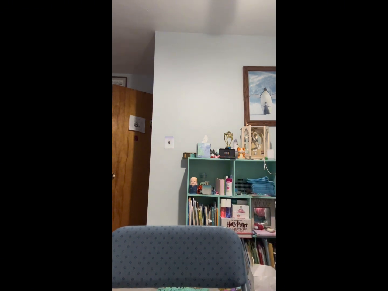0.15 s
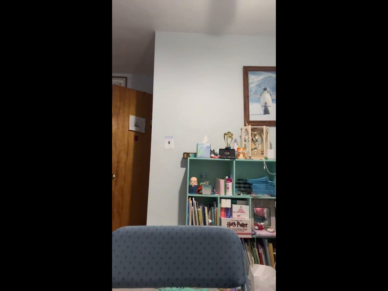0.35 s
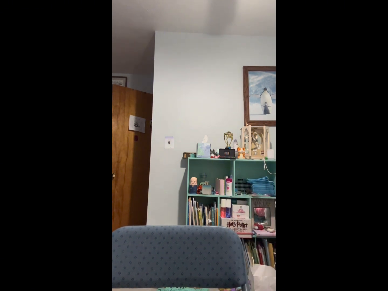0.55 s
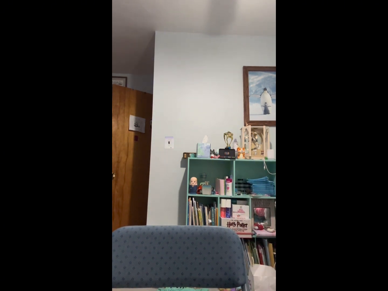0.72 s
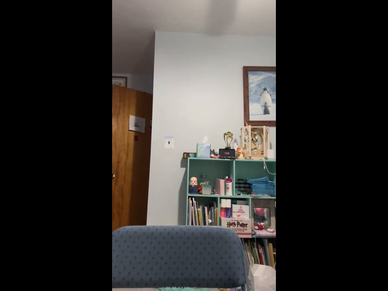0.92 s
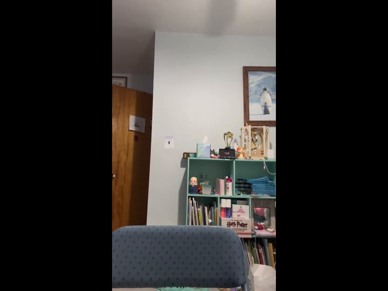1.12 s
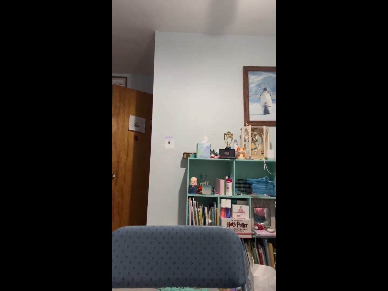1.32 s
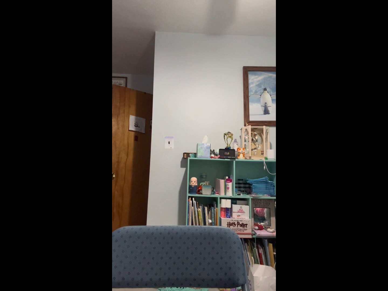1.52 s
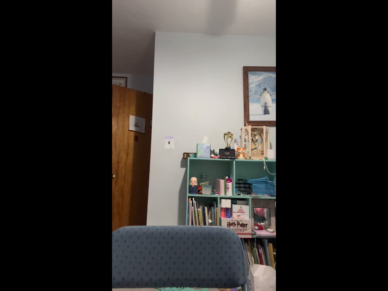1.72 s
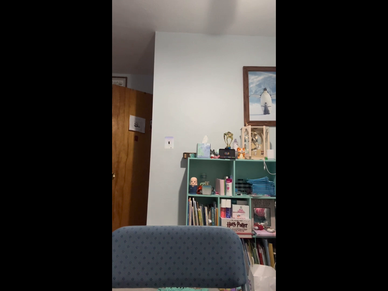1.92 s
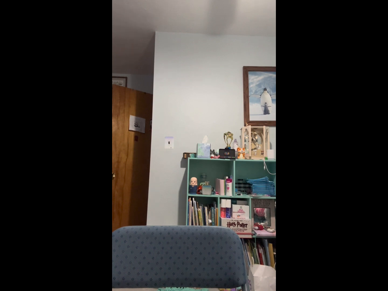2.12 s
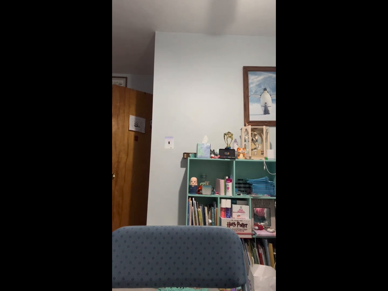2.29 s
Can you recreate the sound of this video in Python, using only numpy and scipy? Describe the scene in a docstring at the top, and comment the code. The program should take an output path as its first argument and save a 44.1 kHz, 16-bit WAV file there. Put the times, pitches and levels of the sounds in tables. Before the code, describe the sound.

Rummaging in a wooden drawer in a small quiet bedroom: a hard thump, a hollow rattle, two rough scraping strokes with knocks and ticks, then faint soft bumps. Close stereo microphone, drawer slightly to the left.

```python
"""Rummaging in a wooden drawer

In a small bedroom things scrape along the drawer's bottom in two long strokes: shaped bands of noise,
with one chirp of binding wood. Thumps, a rattling hollow item and light taps are damped sinusoids with
puffs of contact noise, small hard pieces tick as puffs alone, and a few soft bumps follow.
Short sounds get a decaying noise tail for the room, and quiet air noise lies beneath."""
import sys
import numpy as np
from scipy import signal
from scipy.fft import rfft, irfft, next_fast_len
from scipy.io import wavfile
from scipy.ndimage import uniform_filter1d, map_coordinates

SR = 44100
rng = np.random.default_rng(int(sys.argv[2]) if len(sys.argv) > 2 else 0)


def master(y):
    """Save y as 16-bit WAV."""
    cut = np.clip(np.atleast_2d(y).T, -1, 1)
    pcm = np.round(cut * 32767)  # scale
    wavfile.write(sys.argv[1], SR, pcm.astype(np.int16))


N = 103635  # samples
HALF_SECOND = SR // 2  # samples


def amp(db):
    """Level: decibels become an amplitude ratio."""
    return 10 ** (np.asarray(db) / 20)


def unit(x):
    """Normalisation: scale to rms 1."""
    return x / np.sqrt(np.mean(x ** 2) + 1e-20)


def along(points, hz):
    """Logarithmic frequency: interpolate (Hz, value) points on a log axis."""
    f, v = np.transpose(points)
    return np.interp(np.log(hz + 1), np.log(f + 1), v)


def wobble(rate):
    """Random modulation: straight lines join random knots, rate knots a second."""
    knots = rng.standard_normal(N)
    return map_coordinates(knots, [np.arange(N) * rate / SR], order=1)


def filtered(x, response):
    """Linear filtering: the spectrum of x is multiplied by a response of frequency."""
    m = next_fast_len(N + SR // 2)
    return irfft(rfft(x, m) * response(np.fft.rfftfreq(m, 1 / SR)), m)[..., :N]


# Likeness of the two channels.
# Each row: frequency in Hz, left-right correlation from 0 to 1.
CHANNEL_LIKENESS = [(60, .9), (150, 0.94), (300, 0.048), (700, 0), (2000, 0), (6000, 0), (8000, 0.88),
                    (14000, 0.96)]


def noise(spectrum, likeness=CHANNEL_LIKENESS):
    """Partial coherence: mid and side noises, mixed by frequency, give coloured stereo of rms 1."""
    def mid_side_gains(hz):
        turn = np.arccos(np.clip(along(likeness, hz), -1, 1)) / 2
        return amp(along(spectrum, hz)) * [np.cos(turn), np.sin(turn)]

    mid, side = filtered(rng.standard_normal((2, N)), mid_side_gains)
    return unit(np.array([mid + side, mid - side]))


def fade(t60, rise):
    """Exponential damping: half a second with rise time constant and 60 dB decay time in seconds."""
    t = np.arange(HALF_SECOND) / SR
    return (1 - np.exp(-t / rise)) * np.exp(-np.log(1000) * t / t60)


def ring(hz, t60, rise, lag):
    """Damped oscillation: one mode in two channels, the right one lagging by lag radians."""
    t = np.arange(HALF_SECOND) / SR
    return np.sin(2 * np.pi * hz * t - np.array([[0], [lag]])) * fade(t60, rise)


def modes(table, rise, ratio=1):
    """Modal superposition: strengths and pitches shift a little with each point of contact."""
    scatter_db, detune = 1.5, .008  # standard deviations; detune is a fraction of the pitch
    total = 0
    for hz, db, t60 in table:
        gain = amp(db + scatter_db * rng.normal()) * rng.choice([-1, 1])
        pitch = hz * ratio * (1 + detune * rng.normal())
        lag = rng.uniform(-0.9, 1) * np.arccos(np.clip(along(CHANNEL_LIKENESS, hz), -1, 1))
        total = total + gain * ring(pitch, t60, rise, lag)
    return total / np.sqrt(len(table))


def burst(source, t60, rise):
    """Transient noise: a decaying puff cut from a random place in a longer noise."""
    start = rng.integers(N - HALF_SECOND)
    return source[:, start:start + HALF_SECOND] * fade(t60, rise)


def softened(x, bright_hz):
    """Contact stiffness: a soft contact, as a minimum-phase low-pass, leaves high notes unexcited."""
    rolloff_db_per_oct = 7.5  # well above bright_hz
    hz = np.fft.rfftfreq(SR, 1 / SR)
    log_gain = np.log(amp(-rolloff_db_per_oct / 4 * np.log2(1 + (hz / bright_hz) ** 4)))
    # Folding the cepstrum onto positive times makes the filter causal.
    fold = np.r_[1, np.full(SR // 2 - 1, 2), np.zeros(SR - SR // 2)]
    causal = irfft(log_gain) * fold
    return irfft(rfft(x, SR) * np.exp(rfft(causal)))[:, :x.shape[1]]


# Reverberation of the bedroom.
# Each row: frequency in Hz, 60 dB decay time in seconds.
ROOM_DECAY = [(80, 0.25), (250, 0.14), (1000, 0.022), (4000, 0.026), (12000, 0.067)]


def in_room(x, wet_db):
    """Reverberation: convolution with a delayed noise tail that decays at its own rate in each band."""
    delay_s = .012
    hz, t, z = signal.stft(rng.standard_normal((2, SR // 3)), SR, nperseg=256)
    decay = np.exp(-np.log(1000) * t / along(ROOM_DECAY, hz)[:, None])
    tail = signal.istft(z * decay, SR, nperseg=256)[1]
    tail = np.pad(tail / np.linalg.norm(tail[0]), ((0, 0), (int(delay_s * SR), 0)))
    return x + amp(wet_db) * signal.fftconvolve(x, tail, axes=1)[:, :x.shape[1]]


def add(out, s, x):
    """Superposition: mix x into out at time s in seconds."""
    part = out[:, max(round(s * SR), 0):][:, :x.shape[1]]
    part += x[:, :part.shape[1]]


# Still air of the room.
# Each row: frequency in Hz, relative density in dB per Hz.
AIR_SPECTRUM = [(15, -46.5), (25, 0.5), (274, -10), (1570, -30), (3440, -29.5), (3720, -32), (5430, -36),
                (12500, -39.5), (15500, -49)]


def still_air():
    """Stationary noise: the quiet room has a steady coloured floor."""
    return amp(-74) * noise(AIR_SPECTRUM)


def patchy(x):
    """Shifting resonance: narrow bands come and go as the contact points shift."""
    depth_db = 2.6  # rms
    z = signal.stft(x, nperseg=1024)[2]
    field = rng.standard_normal(z.shape[1:])
    field = uniform_filter1d(field, size=3, axis=0)  # blur over frequency
    field = uniform_filter1d(field, size=4, axis=1)  # blur over time
    return unit(signal.istft(z * amp(depth_db * unit(field)), nperseg=1024)[1][:, :N])


TICK_RISE_S = .0005  # time constant, shared by catches and ticks


def catches():
    """Stick-slip: random little catches on the wood form a decaying envelope of rms 1."""
    per_s, spread_db, t60_s = 98, 7.5, 0.034
    strength_db = spread_db * np.clip(rng.standard_normal(N), -2, 2)
    kicks = (rng.random(N) < per_s / SR) * amp(strength_db)
    return unit(signal.fftconvolve(kicks, fade(t60_s, TICK_RISE_S))[:N])


# The sliding load, before the overall trims and wobbles in sliding().
# Each row: time in seconds, then levels of scrape, rumble, treble rasp and top hiss, all in dB.
SLIDE_LEVELS = [(0, -53.5, -51.5, -65.5, -73), (.101, -52.5, -45, -60.5, -71.5),
                (.151, -44, -39.5, -47.5, -58.5), (0.2, -37, -30, -41.5, -54),
                (0.3, -40.5, -40, -41.5, -55.5), (.36, -32, -26.5, -40.5, -56),
                (.46, -47.5, -31, -51, -72.5), (.56, -42, -40, -43.5, -57.5),
                (0.682, -34.5, -26.5, -41, -57), (.75, -47.5, -31, -54.5, -77),
                (0.819, -58, -42, -69.5, -99), (.891, -51, -44.5, -59.5, -83),
                (.938, -38, -30.5, -56, -71.5), (1.0, -41.5, -33, -46.5, -62), (1.045, -38, -35, -44, -61),
                (1.111, -36, -27.5, -41.5, -55.5), (1.209, -34.5, -29, -40.5, -56.5),
                (1.338, -42, -34, -48.5, -65.5), (1.431, -43, -43, -49.5, -59.5),
                (1.48, -46.5, -42.5, -53.5, -66), (1.539, -48, -40, -55, -61.5),
                (1.62, -70, -50, -74.5, -85.5), (1.68, -79, -60.5, -93, -97), (1.74, -62.5, -55, -80, -89),
                (1.791, -76, -50.5, -80, -94), (1.825, -59, -43, -77, -90),
                (1.892, -84.5, -61, -84.5, -101), (1.95, -82, -56.5, -94.5, -100.5),
                (2.07, -92, -82.5, -94, -91), (2.14, -86, -70.5, -84, -78.5),
                (2.188, -63, -50, -79.5, -76.5), (2.271, -85, -58.5, -75.5, -81),
                (2.35, -64, -58, -63, -73)]
# Noise spectra of the four parts, and of the clatter in catches and rattles.
# Each row: frequency in Hz, relative density in dB per Hz.
SCRAPE_SPECTRUM = [(150, -32.5), (400, -5.5), (520, 13), (750, 12.5), (1000, 11.5), (1170, 0), (1500, 1),
                   (2000, -10.5), (4000, -39.5)]
RUMBLE_SPECTRUM = [(20, -32.5), (45, -13), (75, 1.5), (130, -1.5), (200, -2.5), (260, -2.5), (310, -10.5),
                   (375, -4.5), (460, -27.5), (900, -42), (3000, -87)]
RASP_SPECTRUM = [(700, -27.5), (1400, 5.5), (2200, -0.5), (3200, -.5), (5000, -4.5), (6500, -8.5),
                 (8000, -20), (11000, -35)]
HISS_SPECTRUM = [(3000, -53), (6500, -0.5), (8200, -0.5), (10500, -1.5), (12000, 3.5), (13300, 5),
                 (14200, -5.5), (14800, -26.5), (16000, -48.5)]
CLATTER_SPECTRUM = [(200, -13), (700, 10.5), (1500, -8.5), (3000, -8.5), (5000, -19), (8000, -32),
                    (14000, -63.5)]


def sliding():
    """Friction noise: a catching scrape, gritty rasp and hiss lie above the drawer's juddering rumble."""
    s, *levels = np.transpose(SLIDE_LEVELS)
    t = np.arange(N) / SR
    scrape_db, rumble_db, rasp_db, hiss_db = [np.interp(t, s, level) for level in levels]
    judder_db = 1.5 * wobble(rate=85)
    grit_db = 1.3 * wobble(rate=370)
    caught = amp(-8.5) * catches() * noise(CLATTER_SPECTRUM)
    scrape = amp(-2 + scrape_db + judder_db + grit_db) * (patchy(noise(SCRAPE_SPECTRUM)) + caught)
    rasp = amp(-1.5 + rasp_db + grit_db) * patchy(noise(RASP_SPECTRUM))
    rumble = amp(rumble_db + judder_db) * noise(RUMBLE_SPECTRUM)
    hiss = amp(-0.5 + hiss_db) * noise(HISS_SPECTRUM)
    return scrape + rasp + rumble + hiss


# Contact noise of a tap.
# Each row: frequency in Hz, relative density in dB per Hz.
SCUFF_SPECTRUM = [(150, -16.5), (450, -1.5), (850, -4.5), (1150, -3.5), (1550, -3.5), (2100, -8.5),
                  (2900, -9), (5000, -19), (9000, -34)]
# Light taps of assorted items.
# Each row: start in seconds, level in dB, note in Hz, note gain beside the scuff in dB,
# 60 dB decay time in seconds, brightness of the contact in Hz.
TAP_EVENTS = [(.043, -43.5, 1515, 5, 0.03, 2180), (.076, -44.5, 970, 5, .035, 1510),
              (0.162, -35, 986, -4, 0.05, 1590), (.328, -23, 690, 6, 0.023, 1800),
              (.525, -27, 1530, -5, 0.054, 1900), (.667, -24.5, 1370, -7, 0.025, 2400),
              (0.845, -45, 1430, -7, 0.13, 2230), (1.098, -42, 1508, 1, .08, 2000),
              (1.179, -28.5, 845, 3.5, 0.059, 2040), (1.301, -46.5, 1060, 12, 0.11, 1300),
              (1.36, -37, 776, -6, 0.056, 1300), (1.432, -46, 805, 9, 0.034, 1800),
              (1.484, -44.5, 636, 7.5, 0.064, 1100), (1.694, -67.5, 1300, -7, 0.15, 1400),
              (1.735, -62, 900, 1, .1, 1990), (1.746, -66, 2486, -5, .1, 3200),
              (1.805, -55, 990, 8.5, 0.074, 2180), (1.822, -67, 4760, -3, .16, 4500),
              (2.147, -65, 950, 3.5, 0.072, 1206), (2.187, -60.5, 1290, 5, 0.032, 1200)]


def taps():
    """Impact excitation: assorted items touch with a short scuff and one quickly damped note."""
    rise_s, wet_db, widest_lag_rad = .0007, -5, 4.9
    out, scuff = np.zeros((2, N)), noise(SCUFF_SPECTRUM)
    for s, db, hz, note_db, t60, bright_hz in TAP_EVENTS:
        contact = softened(burst(scuff, t60, rise_s), bright_hz)
        note = amp(note_db) * ring(hz, t60, rise_s, widest_lag_rad * rng.uniform(-1, 1))
        add(out, s, amp(db) * in_room(contact + note, wet_db))
    return out


THUMP_WET_DB = -18  # room level, shared by thumps and squeak
# Modes of the drawer's panels, before the scatter of each contact.
# Each row: frequency in Hz, level in dB, 60 dB decay time in seconds.
PANEL_MODES = [(97, -12, 0.28), (119, -2.5, 0.032), (170, 12, 0.072), (229.5, 5.5, 0.28), (279.4, 3.5, .13),
               (356, 5, .15), (390, 1, 0.11), (491, -3.5, 0.12), (533, -5.5, .14), (648, -3.5, .09),
               (804, -4, 0.24), (844, -8.5, 0.27), (977, -1, 0.12), (1085, -8.5, 0.29)]
# Contact noise of a thump.
# Each row: frequency in Hz, relative density in dB per Hz.
CRUNCH_SPECTRUM = [(30, -27.5), (90, -10.5), (400, 5.5), (700, -3), (1200, -8.5), (2500, -9.5),
                   (6000, -23.5), (12000, -46.5)]
# Thumps on the wood.
# Each row: start in seconds, level in dB, pitch in Hz, 60 dB decay time in seconds,
# rise time constant in seconds, panel ring in dB, brightness of the contact in Hz,
# knock of the drawer front in dB, lag of the right channel in radians; panel and front ride on the level.
THUMP_EVENTS = [(.183, -25, 197.6, 0.13, 0.012, -12, 430, -43, 0.4),
                (0.3222, -18.5, 264, 0.038, 0.0023, -9.5, 900, -15, 1.7),
                (0.3323, -1, 242, 0.058, 0.00063, -15.5, 700, -31, 1.87),
                (.345, -19.5, 274, 0.046, .0042, -0.5, 403, -40, 2.4),
                (.366, -14.5, 266, 0.16, 0.0024, -15, 300, -32, 0.71),
                (0.5191, -9.5, 246.7, 0.097, .0022, -25, 800, -11.5, 1.6),
                (.528, -5.5, 241.3, .09, 0.00099, -7.5, 330, -20, 0.83),
                (.669, -13, 226, 0.15, 0.003, -7.5, 1200, -10.5, 1.8),
                (.675, -7.5, 169.2, 0.13, 0.0071, -9, 695, -31, 0.8),
                (.688, -11.5, 203.5, 0.08, .003, -11.5, 496.6, -35, 0.9),
                (0.705, -10.5, 222, 0.087, 0.0019, -11.5, 296, -29.5, .26),
                (.911, -18, 202, 0.07, 0.0025, -8, 740, -4, 1.24),
                (.931, -4.5, 102, 0.11, .014, -22, 440, -24.5, 0.13),
                (.960, -21, 253, 0.077, .002, -12, 494, -20, 0.42),
                (1.001, -21.5, 184, 0.093, .004, -8.5, 400, -25, .4),
                (1.117, -24, 182, .08, .003, -5, 600, -14, 0.72),
                (1.195, -22.5, 185, 0.066, 0.0018, -11, 700, -11, 0.67),
                (1.5339, -20, 220, 0.059, 0.0011, -15, 410, -24.5, 1.05),
                (1.549, -17, 129.5, 0.099, 0.0032, -24, 200, -34, .3),
                (1.570, -18.5, 117, 0.079, 0.0032, -21, 193, -50, .083),
                (1.797, -33, 202, 0.11, 0.0066, -14.5, 449, -39, .6),
                (1.81, -37.5, 367, 0.075, 0.0019, -13, 450, -31, 2.5),
                (1.831, -34.5, 274, 0.064, 0.0053, -6.5, 420, -35, 1.2),
                (1.901, -37, 216, 0.12, 0.0059, -20, 400, -34, 0.33),
                (2.160, -48.5, 161, 0.079, 0.0045, -11.5, 330, -33, .38),
                (2.203, -36.5, 104, .1, 0.0024, -18, 250, -46, 0.26)]


def thumps():
    """Modal impact: a low short note with panel ring and crunch; the heavy chest answers late and low."""
    panel_rise_s, boom_delay_s = .002, 0.0083
    out, crunch_noise = np.zeros((2, N)), noise(CRUNCH_SPECTRUM)
    boom = ring(hz=97, t60=.08, rise=.0071, lag=0)
    for s, db, hz, t60, rise, panel_db, bright_hz, front_db, lag in THUMP_EVENTS:
        note = ring(hz, t60, rise, lag)
        crunch = amp(-4) * burst(crunch_noise, t60=.1, rise=panel_rise_s)
        wood = softened(modes(PANEL_MODES, panel_rise_s) + crunch, bright_hz)
        front = amp(front_db) * ring(hz=695.7, t60=.1, rise=0.0021, lag=lag)
        add(out, s, amp(db) * in_room(note + amp(panel_db) * wood + front, THUMP_WET_DB))
        add(out, s + boom_delay_s, amp(db - 13) * boom)
    return out


# Noises of a small hard piece.
# Each row: frequency in Hz, relative density in dB per Hz.
SNAP_SPECTRUM = [(400, -19.5), (1500, 0.5), (3000, 6), (6000, 4.5), (8000, -8), (12000, -34)]
SIZZLE_SPECTRUM = [(4000, -28.5), (7500, -5), (10500, -4.5), (12500, 4), (14000, -1.5), (15000, -14.5),
                   (16000, -29)]
# Likeness of the sizzle's channels.
# Each row: frequency in Hz, left-right correlation from 0 to 1.
SIZZLE_LIKENESS = [(7000, .3), (13000, .05)]
# Small pieces catching and slipping.
# Each row: start in seconds, snap level in dB, sizzle level in dB, 60 dB decay time in seconds.
TICK_EVENTS = [(.3064, -66, -20, 0.0037), (.3285, -34.5, -46, 0.036), (0.5227, -20, -53, 0.013),
               (.670, -48, -53, 0.044), (0.842, -57, -72, 0.031), (1.0598, -30, -30, .018),
               (1.075, -37.5, -41, 0.1), (1.177, -35, -40, 0.091), (1.192, -35, -44.5, 0.12),
               (1.357, -39.5, -43.5, 0.03), (1.373, -41.5, -50.5, 0.081), (1.424, -44, -57, 0.038),
               (1.439, -44.5, -53, 0.075), (1.516, -60, -47.5, 0.017), (1.53, -53, -50, 0.044)]


def ticks():
    """Stick-slip release: small hard pieces catch and slip with a snap and a high sizzle."""
    out = np.zeros((2, N))
    snap_noise, sizzle_noise = noise(SNAP_SPECTRUM), noise(SIZZLE_SPECTRUM, SIZZLE_LIKENESS)
    for s, snap_db, sizzle_db, t60 in TICK_EVENTS:
        snap = amp(snap_db) * burst(snap_noise, t60, TICK_RISE_S)
        sizzle = amp(sizzle_db) * burst(sizzle_noise, t60, TICK_RISE_S)
        add(out, s, in_room(snap, wet_db=-11.5) + sizzle)
    return out


# Modes of the hollow item, before the pitch ratio and scatter of each contact.
# Each row: frequency in Hz, level in dB, 60 dB decay time in seconds.
HOLLOW_MODES = [(679, 0, 0.09), (731, 0.5, 0.14), (923, -6.5, 0.09), (1334, -1, 0.098), (1415, -14.5, 0.22),
                (1470, -6.5, .16), (1610, -11.5, 0.078), (2400, -8, 0.037), (2650, -8.5, .06),
                (2950, -10, .05), (3150, -17.5, 0.055), (4080, -13.5, .05), (4820, -18.5, .05)]
# Clacks of the hollow item as it rattles.
# Each row: start in seconds, level in dB, brightness of the contact in Hz, pitch ratio.
CLACK_EVENTS = [(.3925, -18, 4470, 1.07), (.404, -17, 3530, .99), (.4125, -16.5, 3500, 1),
                (.429, -28, 1500, 1.015)]


def clacks():
    """Modal resonance: a light hollow item rattles on its neighbours, its pitch shifting slightly."""
    out, clatter_noise = np.zeros((2, N)), noise(CLATTER_SPECTRUM)
    for s, db, bright_hz, ratio in CLACK_EVENTS:
        body = modes(HOLLOW_MODES, rise=0.0016, ratio=ratio)
        clatter = amp(-11) * burst(clatter_noise, t60=.08, rise=0.0019)
        add(out, s, amp(db) * in_room(softened(body + clatter, bright_hz), wet_db=-2.5))
    return out


def squeak():
    """Stick-slip: the wood binds for a moment in mid-stroke and gives one dull chirp."""
    out = np.zeros((2, N))
    chirp = ring(hz=558, t60=0.059, rise=0.023, lag=0)
    add(out, .6, amp(-16) * in_room(chirp, THUMP_WET_DB))
    return out


# Sideways balance of the drawer.
# Each row: frequency in Hz, left gain minus right gain in dB.
LEFT_BALANCE = [(30, 5.5), (70, 2.5), (150, 5.5), (300, 2), (700, 3), (1500, 4), (3000, 6), (6000, 5.5),
                (8000, 2.5), (14000, -1.5)]


def scene():
    """Interaural level difference: the drawer stands to the left, in a quiet room."""
    drawer = sliding() + taps() + thumps() + ticks() + clacks() + squeak()
    half_each_way = np.array([[.5], [-.5]])
    placed = filtered(drawer, lambda hz: amp(along(LEFT_BALANCE, hz) * half_each_way))
    return still_air() + placed


def record(dry):
    """Band limiting and saturation: the microphone sheds deep bass, rounds peaks and cuts the top."""
    low_cut_hz, ceiling, top_hz = 46, .97, 15950  # ceiling in full-scale units
    x = signal.sosfilt(signal.butter(2, low_cut_hz, "highpass", fs=SR, output="sos"), dry)
    x = x / (1 + np.abs(x / ceiling) ** 8) ** (1 / 8)
    return filtered(x, lambda hz: hz < top_hz)


dry = scene()
out = record(dry)
master(out)
```